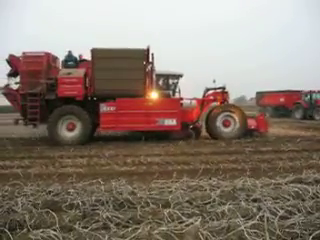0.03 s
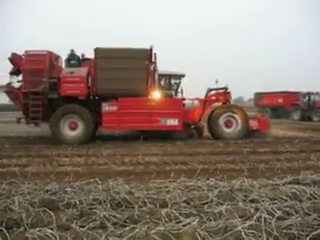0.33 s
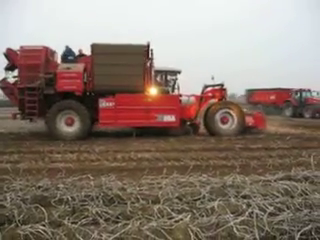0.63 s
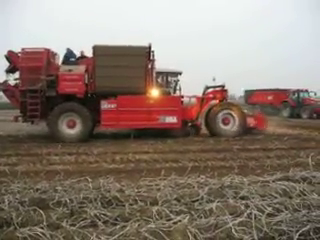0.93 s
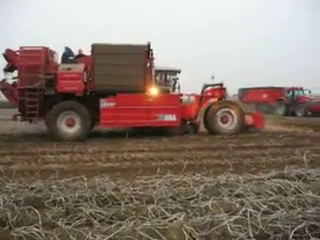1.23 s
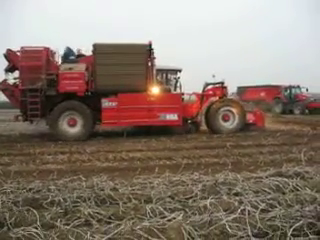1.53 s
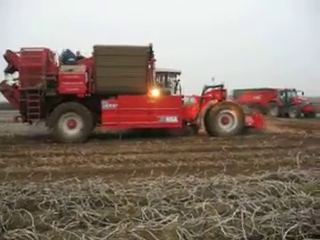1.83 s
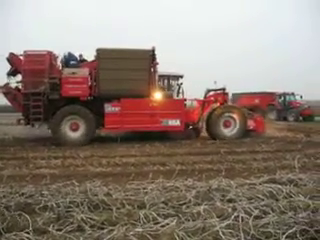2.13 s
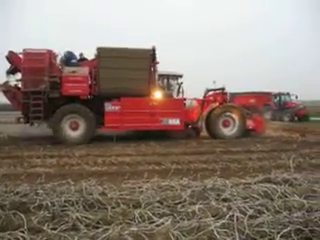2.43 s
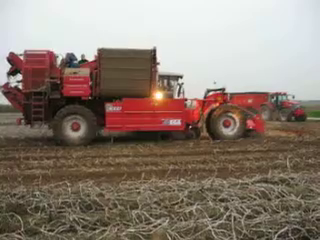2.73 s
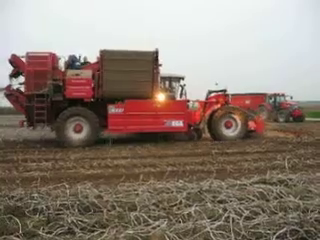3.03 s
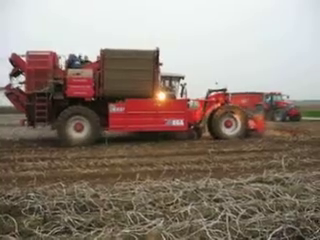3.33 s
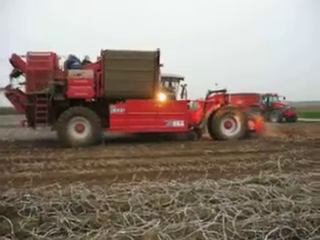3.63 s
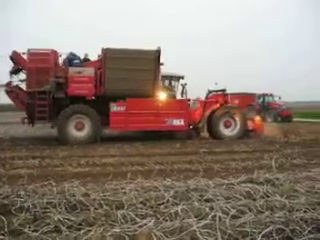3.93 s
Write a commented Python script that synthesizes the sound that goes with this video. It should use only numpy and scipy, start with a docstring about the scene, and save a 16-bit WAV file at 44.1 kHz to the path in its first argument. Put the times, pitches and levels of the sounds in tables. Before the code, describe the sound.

The dense, slightly dull roar of a harvester runs throughout, heard from a short distance outdoors. Diesel knocking blends with rattling chains, a high whine that fades in and out and booming sheet metal, with one thin click halfway.

```python
"""A muddy field, where a potato harvester crawls along some way off at a steady speed.
Its six-cylinder diesel hums and clatters, an oil pump whines, and sieve belts shake soil and stones.
The sheet-metal body booms as the load varies; a fan, a rotor, gears and a tractor add their own tones.
There are three faint, high chirps. The sound is dull above 6 kHz, apart from one thin click halfway."""
import sys
import numpy as np
from scipy import signal
from scipy.fft import rfft, irfft, next_fast_len
from scipy.io import wavfile
from scipy.ndimage import uniform_filter1d, map_coordinates

SR = 44100
rng = np.random.default_rng(int(sys.argv[2]) if len(sys.argv) > 2 else 0)


def bounce(signal):
    """Save signal as a 16-bit WAV file at the path given by the first command-line argument."""
    frames = np.transpose(np.atleast_2d(signal))
    limited = np.clip(frames, -1, 1)
    pcm = np.round(limited * 32767).astype(np.int16)
    wavfile.write(sys.argv[1], SR, pcm)


N = 176400  # 4 seconds
CYCLE_HZ = 17.295  # engine cycles a second; each cylinder fires once a cycle


def amp(db):
    """Turn decibels into a number to multiply a sound by."""
    return 10 ** (np.asarray(db) / 20)


def unit(x):
    """Scale a sound to an average strength (rms) of 1."""
    return x / np.sqrt(np.mean(x ** 2) + 1e-20)


def curve(rows):
    """Join (time, value) points with straight lines, giving one value per sample."""
    return np.interp(np.arange(N) / SR, *np.transpose(rows))


def wobble(rate):
    """A smooth curve through `rate` random points a second."""
    return map_coordinates(rng.standard_normal(int(N * rate / SR) + 4), [np.arange(N) * rate / SR])


def filtered(x, response):
    """Multiply each frequency f in a sound by response(f)."""
    size = next_fast_len(N + SR // 2)
    return irfft(rfft(x, size) * response(np.fft.rfftfreq(size, 1 / SR)), size)[:N]


def coloured(x, spectrum):
    """Shape a sound's lows and highs with (f/Hz, level/dB) points, then scale it to strength 1."""
    hz, db = np.transpose(spectrum)
    return unit(filtered(x, lambda f: amp(np.interp(np.log(f + 1), np.log(hz), db))))


def patchy(patchy_db):
    """Hiss with random louder and softer patches in time and pitch."""
    hiss = signal.stft(rng.standard_normal(N), nperseg=512)[2]
    patches = uniform_filter1d(rng.standard_normal(hiss.shape), size=5, axis=0)
    patches = uniform_filter1d(patches, size=12, axis=1)
    return signal.istft(hiss * amp(patchy_db * unit(patches)), nperseg=512)[1][:N]


def turns(hz):
    """Count the turns of a part that spins hz times a second at normal engine speed."""
    # engine speed under load: t/s, share of normal speed
    speed = [(0, 1.001), (.5, .998), (.85, 1.0), (1.35, .999), (1.7, 1.0004), (2.05, .9995), (2.7, 1.002),
             (2.92, 1.0), (3.1, 1.002), (3.4, 1.0005), (3.65, .9985), (4, .998)]
    return hz * np.cumsum(curve(speed)) / SR


def tone(hz, flutter):
    """A tone of strength 1 that follows the engine; more flutter makes it less steady."""
    slow = wobble(5.004) + 1j * wobble(5)  # complex numbers sway both level and timing
    fast = wobble(30) + 1j * wobble(30)
    sway = 1 + flutter * (slow + .5 * fast)
    spin = np.exp(2j * np.pi * (turns(hz) + rng.random()))
    return unit(np.real(sway * spin))


def exhaust():
    """Six firings a cycle make the main hum; unequal cylinders add weaker tones."""
    # exhaust tones: multiple of the engine cycle, level/dB
    tones = {6: -31, 7: -51, 9: -38, 11: -39.5, 12: -43, 13: -50, 18: -45.5, 24: -41, 48: -45.5, 51: -50}
    return sum(amp(db) * tone(k * CYCLE_HZ, flutter=.08 if k == 6 else .3) for k, db in tones.items())


def knock(cylinders=6, level_db=-33.5, decay_s=.014, uneven_db=2, repeat_share=.7):
    """Each cylinder knocks in its own way once a cycle; part of the knock repeats and part is new."""
    # lows and highs of the diesel knock: f/Hz, relative level/dB
    spectrum = [(100, -21.5), (330, -8), (470, 3.5), (850, 1), (1100, -6), (1450, -1), (1750, -4.5),
                (2000, -3), (2500, -4), (3100, -8), (4000, -9), (5100, -12), (6100, -43)]
    cycle = turns(CYCLE_HZ) % 1
    period = int(SR / CYCLE_HZ)
    repeating = map_coordinates(rng.standard_normal(period), [cycle * (period - 1)])
    noise = np.sqrt(repeat_share) * repeating + np.sqrt(1 - repeat_share) * rng.standard_normal(N)
    cylinder, since_firing = np.divmod(cycle * cylinders, 1)
    strength = amp(uneven_db * np.cos(2 * np.pi * cylinder / cylinders))
    fade = np.exp(-since_firing / (cylinders * CYCLE_HZ * decay_s))
    return amp(level_db) * coloured(noise * strength * fade, spectrum)


def pump(piston_hz=412.8):
    """The oil pump's pistons whine; a whistle at six times their rate fades in and out."""
    # pump tones: multiple of the piston rate, level/dB
    tones = {1: -48.5, 2: -50.5, 4: -49.5, 5: -47.5, 7: -47, 8: -53}
    # loudness of the whistle: t/s, level/dB
    whistle_level = [(0, -41), (.3, -40), (.9, -38.5), (1.02, -42), (1.2, -36), (1.85, -40), (2.02, -53),
                     (2.15, -35.5), (2.45, -55), (2.8, -35.5), (3.03, -44.5), (3.42, -37), (4, -47.5)]
    whine = sum(amp(db) * tone(k * piston_hz, flutter=.39) for k, db in tones.items())
    return whine + amp(curve(whistle_level)) * tone(6 * piston_hz, flutter=.09)


def spinning_parts(fan_hz=264.5, drive_hz=494.3):
    """The fan, tractor, rotor and gears each hum or sing at their own pitch."""
    # tractor firing, rotor, the rotor's octave, three pairs of gears: f/Hz
    pitches = [74, 47.8, 95.6, 1970.5, 2053, 3853]
    # loudness of those six tones: level/dB
    levels = [-39.5, -47.5, -45.5, -46.5, -56, -53.5]
    # loudness of the fan's main tone: t/s, level/dB
    fan_level = [(0, -40.5), (.7, -41.5), (1.6, -34.5), (2.3, -44), (3, -50.5), (4, -49)]
    # a drive gear that sings out late: t/s, level/dB
    drive_level = [(0, -54), (2.7, -44), (3.1, -37.5), (4, -35)]
    fan = tone(fan_hz, flutter=.12) + amp(-7.5) * tone(2 * fan_hz, flutter=.4)
    others = sum(amp(db) * tone(hz, flutter=.12 if hz < 100 else .6) for hz, db in zip(pitches, levels))
    drive = tone(drive_hz, flutter=.3)
    return amp(curve(fan_level)) * fan + amp(curve(drive_level)) * drive + others


def body(boom_hz=167.4, width_hz=45.5, drone_hz=172, throb_hz=13.2, throb_depth=.6):
    """The wheels and axles rumble and make the sheet-metal body boom; one panel drones and throbs."""
    # lows and highs of the rumble: f/Hz, relative level/dB
    rumble_spectrum = [(20, -12.5), (45, -7.5), (85, -1), (125, 1.5), (230, 0), (290, 2), (350, -14.5),
                       (600, -41.5)]
    # loudness of the rumble: t/s, level/dB
    rumble_level = [(0, -32.5), (.5, -32.5), (1.9, -34), (2.6, -35.5), (3.6, -38.5), (4, -32.5)]
    # loudness of the booming body: t/s, level/dB
    boom_level = [(0, -42), (.24, -27), (.5, -37.5), (.95, -31), (1.2, -29.5), (2.05, -36.5), (2.3, -30.5),
                  (2.75, -29.5), (3.1, -29), (3.25, -26.5), (3.5, -32.5), (4, -29.5)]
    # loudness of the panel, before its throb: t/s, level/dB
    drone_level = [(0, -24), (.17, -46), (.25, -26), (.36, -55), (2.1, -45.5), (2.18, -31), (2.75, -29.5),
                   (2.92, -53), (3.3, -36), (3.48, -28), (3.7, -35), (4, -35)]
    resonance = lambda f: (1j * f * width_hz / (boom_hz ** 2 - f * f + 1j * f * width_hz)) ** 2
    ringing = unit(filtered(rng.standard_normal(N), resonance))
    swell = np.sqrt(np.abs(uniform_filter1d(ringing ** 2, size=4000)) + 1e-6)
    boom = amp(curve(boom_level)) * ringing / swell  # dividing evens out the random swells
    rumble = amp(curve(rumble_level)) * coloured(rng.standard_normal(N), rumble_spectrum)
    throb = 1 + throb_depth * np.sin(2 * np.pi * (turns(throb_hz) + .29 * wobble(5)))
    drone = amp(curve(drone_level)) * throb * tone(drone_hz, flutter=.12)
    return rumble + boom + drone


def sieve_belts(stones_per_s=220, tick_decay_s=.0015, slat_hz=14.2):
    """The belts that sift the soil roar and rattle, and stones tick against their bars."""
    # lows and highs of the roar of belts and soil: f/Hz, relative level/dB
    roar_spectrum = [(100, -27), (260, -13.5), (340, -8.5), (410, 0), (500, 0.5), (620, -2), (740, -6),
                     (850, -3), (1050, -12), (1500, -14), (3000, -26), (6000, -53.5)]
    # rise and fall of the roar: t/s, relative level/dB
    roar_level = [(0, -31), (.25, -26), (.55, -29), (.8, -27), (1.1, -27), (1.6, -27.5), (2.1, -28.5),
                  (2.7, -27.5), (3.4, -27.5), (3.58, -30), (3.7, -28), (4, -28.5)]
    # lows and highs of the rattle of chains and stones: f/Hz, relative level/dB
    rattle_spectrum = [(300, -26.5), (900, -3.5), (1300, 0), (1800, -2), (2050, 4), (2200, 2), (2520, 3.5),
                       (2750, -2.5), (3100, -4.5), (3800, -1.5), (4400, -5.5), (5000, -7.5), (5600, -13),
                       (6200, -55.5)]
    # rise and fall of the rattle: t/s, relative level/dB
    rattle_level = [(0.0, -29), (0.05, -27), (0.08, -31.5), (0.34, -28.5), (0.36, -31), (0.77, -28.5),
                    (1.39, -30), (1.67, -27.5), (1.83, -30.5), (1.84, -25.5), (1.88, -30.5), (2.9, -29),
                    (2.91, -31), (3.42, -29.5), (3.6, -34), (3.69, -27.5), (3.99, -29), (4.0, -31)]
    roar = amp(curve(roar_level) + 1) * coloured(patchy(patchy_db=.62), roar_spectrum)
    hits = (rng.random(N) < stones_per_s / SR) * amp(3 * rng.standard_normal(N))
    fade = np.exp(-np.arange(SR // 20) / SR / tick_decay_s)
    ticks = signal.fftconvolve(hits, fade)[:N] * rng.standard_normal(N)
    chains = amp(-3) * coloured(patchy(patchy_db=1.0), rattle_spectrum)
    stones = amp(-10) * coloured(ticks, rattle_spectrum)
    rattle = amp(curve(rattle_level)) * (chains + stones)
    slats_db = .67 * np.sin(2 * np.pi * turns(slat_hz))  # each passing slat gives a pulse
    churn_db = .37 * wobble(30)  # the load tumbles at random
    return amp(slats_db + churn_db) * (roar + rattle)


def chirps(pitch_hz=5480, width_s=.018):
    """Three short, faint, high chirps near 5.5 kHz."""
    # the peak of each chirp: t/s, level/dB
    peaks = [(1.5, -52), (2.73, -44), (2.96, -48)]
    t = np.arange(N) / SR
    swells = sum(amp(db) * np.exp(-((t - peak_s) / width_s) ** 2) for peak_s, db in peaks)
    return swells * tone(pitch_hz, flutter=.15)


def click(start_s=2.021, level_db=-18.5, decay_s=.0002):
    """One thin, dry click: a sudden jump that dies away at once."""
    t = np.arange(N) / SR - start_s
    return amp(level_db) * (t >= 0) * np.exp(-np.abs(t) / decay_s)


def scene():
    """The machine and the faint chirps, heard from one spot in the open field."""
    return (exhaust() + knock() + pump() + spinning_parts() + body() + sieve_belts() + chirps())[None]


def record(dry):
    """Cut the machine's treble so it sounds dull, then add the click, which reaches higher."""
    dull = filtered(dry[0], lambda hz: hz < 6200)
    return filtered(dull + click(), lambda hz: hz < 15800)[None]


dry = scene()
out = record(dry)
bounce(out)
```